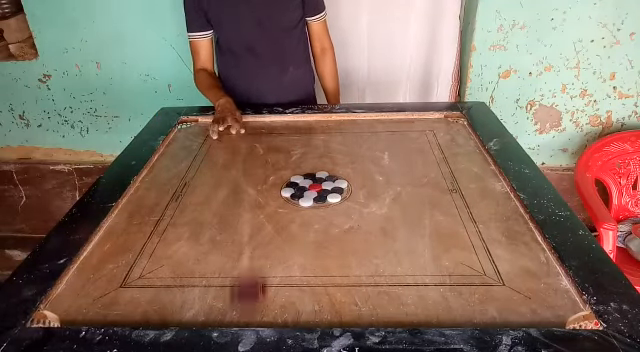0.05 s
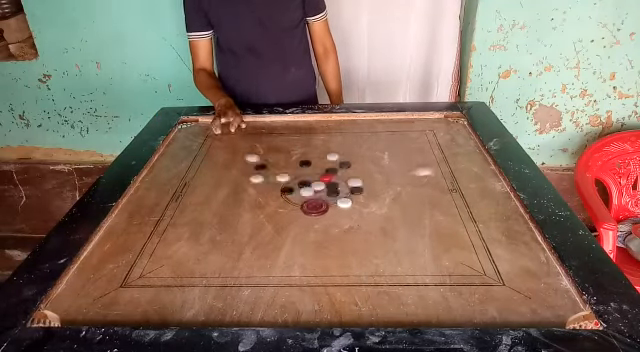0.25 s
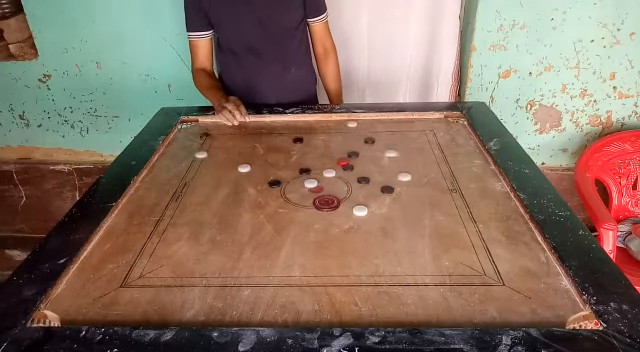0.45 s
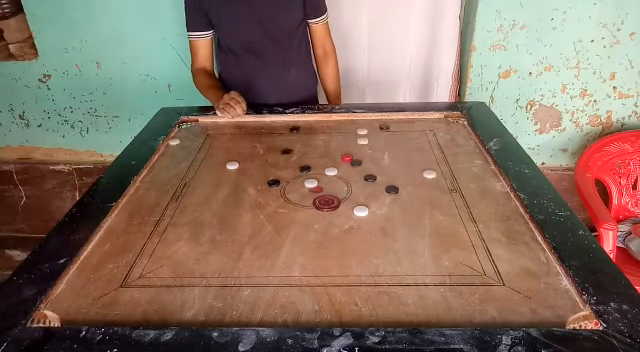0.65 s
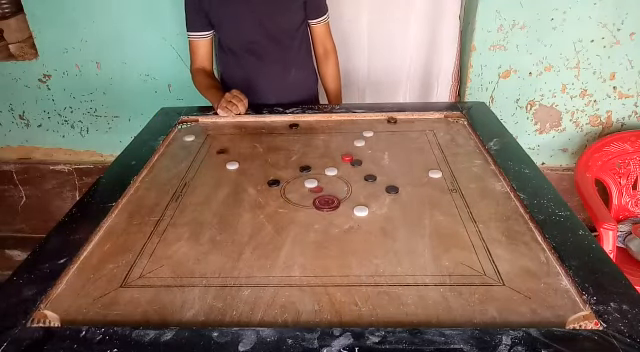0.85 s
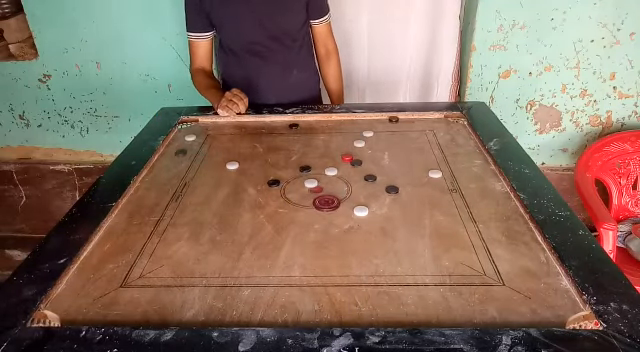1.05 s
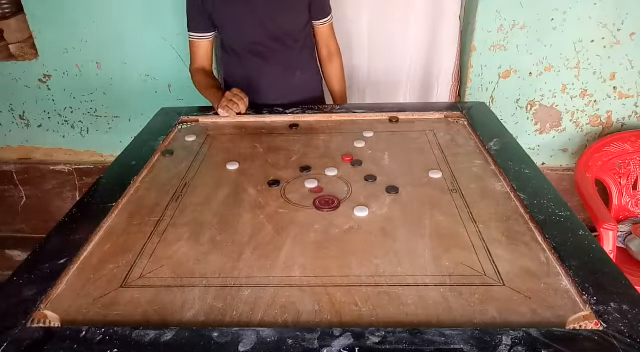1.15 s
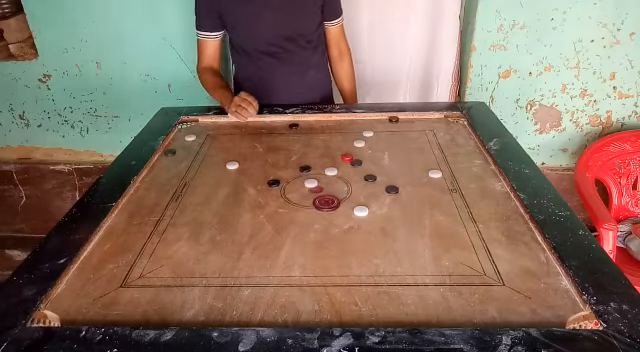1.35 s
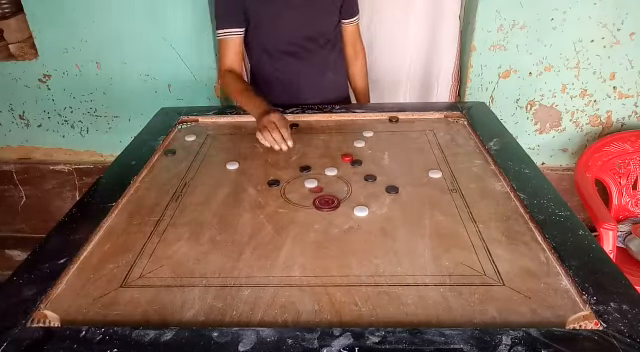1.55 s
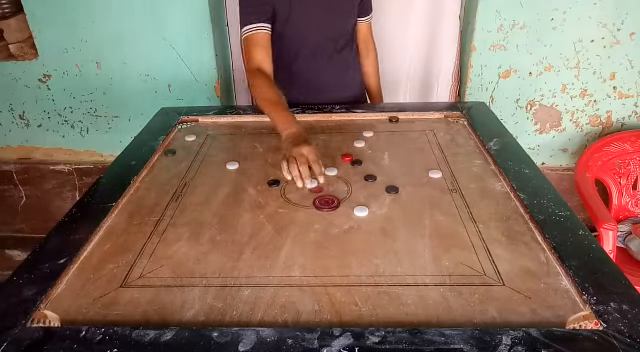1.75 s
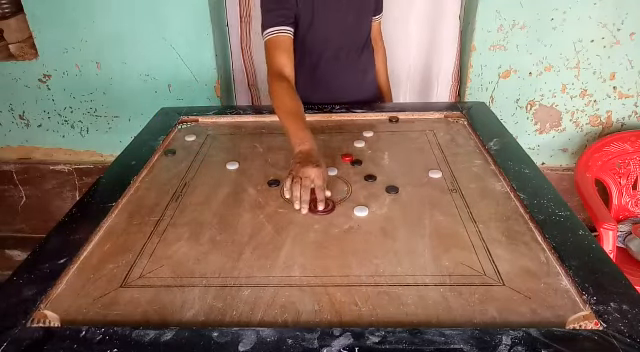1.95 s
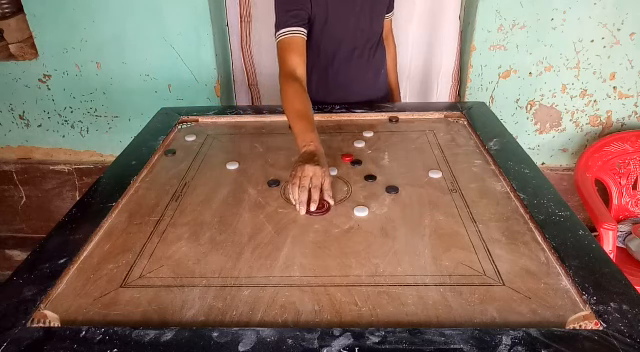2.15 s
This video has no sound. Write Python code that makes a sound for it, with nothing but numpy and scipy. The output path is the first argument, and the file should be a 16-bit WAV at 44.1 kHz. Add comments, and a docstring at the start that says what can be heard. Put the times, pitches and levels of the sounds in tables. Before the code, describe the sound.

Sharp clacks of a carrom break, with discs skating over wood and knocking to a stop.

```python
"""A carrom break in a small room. A finger flicks the striker, which cracks into the pack of discs and
thumps the frame; each impact excites the modes of disc and board, and the hardest overload the close
microphone. The discs skate over the wood with a grainy friction noise, clack on each other and the rim,
and come to rest. A bird chirps faintly outside, and a hand drags the striker back over the board."""
import sys
import numpy as np
from scipy import signal
from scipy.fft import rfft, irfft
from scipy.io import wavfile
from scipy.ndimage import uniform_filter1d

SR = 44100
rng = np.random.default_rng(int(sys.argv[2]) if len(sys.argv) > 2 else 0)


def wav_out(sig):
    """Save sig, one row per channel (or a flat mono array), as 16-bit PCM at SR to the path in sys.argv[1]."""
    wavfile.write(sys.argv[1], SR, np.round(np.clip(np.atleast_2d(sig).T, -1, 1) * 32767).astype(np.int16))


N = 97020
T = np.arange(N) / SR


# Impacts: the finger's flick of the striker, then discs striking discs or the rim (time [s], crack [dB], wood
# body [dB], bass [dB], treble [dB], # board modes [dB], disc note [dB], disc note [Hz])
CLACKS = [(.049, -37, -22.5, 14.5, 9, -38, -39, 4520), (.2062, 2, -4, 7, -20, -17.5, -10.5, 4050),
          (0.2109, -6.5, -18, 1, 2, -26, -16, 4150), (.2195, -10, -11, 14.5, -17, -26, -30, 4180),
          (0.3101, -6.5, -22, 12.5, 8, -36, -20, 4160), (0.4486, -3.5, -17.5, -25, 3, -31, -8.5, 4233),
          (.557, -15.5, -17.5, -7, -12, -30.5, -30, 3800), (.5703, -15, -18.5, -11, -2, -33, -22, 4250),
          (0.6184, -15, -32, 14, -3, -46, -32, 4120), (0.6254, -16, -21, 4.5, -3, -33.5, -16, 4360),
          (0.7683, -15, -22.5, -0.5, -3, -31, -18.5, 4710), (0.84, -15, -43, -21, 2, -39.5, -17, 4290),
          (0.9974, -26, -46, 7, -3, -39, -19, 4390), (1.3176, -29, -20, -5, -9, -36.5, -22, 4510)]
def clack(crack_db, body_db, bass_db, treble_db, ring_db, disc_db, disc_hz):
    """Impulse response: an impact excites disc, board and room, and their free decays superpose."""
    t, brief = T[:32768], T[:2048]
    contact = amp(crack_db) * crack(brief, treble_db) + disc_modes(brief, disc_db, disc_hz)
    wood = amp(body_db) * wood_body(t, bass_db, treble_db) + board_modes(t, ring_db, bass_db, treble_db)
    room = amp(-12.5) * np.hypot(amp(body_db), amp(crack_db - 6)) * room_tail(t, bass_db, treble_db)
    out = wood * rise(t, seconds=.002) + room
    add(out, 0, contact * rise(brief, seconds=.00033))
    return out


# Spectrum of a hard contact (frequency [Hz], level [dB])
CRACK = [(100, -35), (400, -2), (800, -19), (1500, 6.5), (2200, -4), (3100, 11.5), (4300, 6.5),
         (5500, -1.5), (7000, -16), (9500, -44), (15000, -46)]
def crack(t, treble_db):
    """A short contact radiates a broad band: a sharp tick and a slightly longer burst."""
    envelope = fade(t, t60=.024) + amp(1) * fade(t, t60=.007)
    return noise(CRACK, len(t), treble_db=treble_db) * envelope


# Modes of a disc (frequency [multiple of its note], level [dB])
DISC_MODES = [(0.722, -0.5), (.83, -8.5), (1, 1.5)]
def disc_modes(t, level_db, note_hz):
    """Free vibration: a struck disc rings briefly as a sum of damped sinusoids."""
    modes = sum(amp(level_db + db) * sine(note_hz * ratio * t + rng.random((2, 1)))
                for ratio, db in DISC_MODES)
    return modes * fade(t, t60=.04)


# Spectrum of the struck wood (frequency [Hz], level [dB])
WOOD = [(60, -48), (150, -44), (260, -20), (420, -3), (620, -8), (800, -3.5), (1300, 3), (2300, 3),
        (3100, 2), (4200, 2.5), (5500, -16), (7000, -18.5), (9500, -53.5), (15000, -63)]
# Its decay (frequency [Hz], T60 [s])
WOOD_T60 = [(100, 0.56), (400, 0.27), (1200, 0.11), (3500, 0.17), (7000, 0.28), (14000, .1)]
def wood_body(t, bass_db, treble_db):
    """Modal overlap: the wood's densely spaced modes merge into decaying noise."""
    return damp_bands(noise(WOOD, len(t), bass_db, treble_db), WOOD_T60)


# Strongest modes of the board and its frame (frequency [Hz], level [dB], T60 [s])
BOARD_MODES = [(232.1, -16, 0.44), (398.2, -11, 0.24), (469.6, -7.5, 0.25), (870, -6, 0.14),
               (1026, -12, 0.08), (1230, -4.5, 0.14), (1461, -10.5, 0.14), (1759, -11, 0.34),
               (1820, -6, 0.38), (2886, 0, 0.27), (2900, -13, 0.27), (3154, -4.5, 0.41), (3410, -4.5, 0.44),
               (3745, -7, 0.24), (4130, -12.5, 0.13)]
def board_modes(t, ring_db, bass_db, treble_db, spot_db=3, spot_hz=6):
    """Modal excitation: each point of impact rings the board's modes a little differently."""
    out = np.zeros(len(t))
    for hz, db, t60 in BOARD_MODES:
        phase, spot, detune = rng.uniform(-.9, 1, 3)
        gain = amp(ring_db + db + spot_db * spot) * shelves(hz, bass_db, treble_db)
        out += gain * fade(t, t60) * sine((hz + spot_hz * detune) * t + phase)
    return out


def board_resonance(friction, t60=.28):
    """Forced vibration: friction drives each mode of the board as a damped resonator."""
    radius = fade(1 / SR, t60)
    gain = np.sqrt(2 * (1 - radius ** 2))
    return sum(amp(db) * gain * signal.lfilter([1], [1, -radius * np.exp(2j * np.pi * hz / SR)], friction)
               for hz, db, _ in BOARD_MODES).real


# Pushes that sway the whole board (time [s], level [dB])
SWAYS = [(0.068, -37), (.312, -29.5)]
def thump(strike_s=.3099, start_hz=348, end_hz=81, sag_s=.0016, decay_s=.0015, knock_hz=588, sway_hz=93.4):
    """Damped transients: the striker knocks the frame and jolts the microphone; pushes sway the board."""
    out, t = np.zeros((2, N)), T[:SR // 2]
    hz = end_hz + (start_hz - end_hz) * np.exp(-t / sag_s)
    jolt = amp(7.5) * np.exp(-t / decay_s) * sine(np.cumsum(hz) / SR)
    knock = amp(-5.5) * fade(t, t60=.012) * sine(knock_hz * t)
    add(out, strike_s, -(jolt + knock))
    for s, db in SWAYS:
        add(out, s, amp(db) * fade(t, t60=.38) * sine(sway_hz * t))
    return out


# Knocks on the frame (time [s], level [dB], frequency [Hz])
KNOCKS = [(.2062, -9.5, 767), (.4487, -17.5, 803), (.557, -27, 771), (.7688, -21.5, 775),
          (1.118, -34.5, 477), (1.3176, -23, 778), (1.472, -38, 507), (1.69, -45, 491)]
def frame_knocks(upper_ratio=1.145):
    """Resonance: the frame answers a knock with a low mode and a weaker one just above it."""
    out, t = np.zeros((2, N)), T[:16384]
    for s, db, hz in KNOCKS:
        modes = sine(hz * t) + amp(-7) * sine(hz * upper_ratio * t)
        add(out, s, amp(db) * rise(t, seconds=.0045) * fade(t, t60=.12) * modes)
    return out


# Course of the skating discs (time [s], rubbing [dB], rumble [dB])
SLIDE = [(.0, -55, -56), (0.038, -50, -48), (0.06, -32.5, -26.5), (.12, -34, -41), (.2, -32.5, -42.5),
         (.28, -32, -46), (.4, -23, -37), (0.441, -25, -40), (.46, -22, -80), (.51, -25, -71),
         (.54, -26.5, -46.5), (0.662, -22, -42), (.75, -25.5, -39.5), (.86, -28, -42), (.95, -33.5, -42.5),
         (1.1, -38, -43), (1.2, -41.5, -43.5), (1.3, -38.5, -45.5), (1.46, -52, -47.5), (1.58, -60, -50),
         (1.74, -64, -53), (1.901, -57.5, -59.5), (2.1, -56.5, -53.5), (2.19, -61, -46)]
# Spectra of rubbing and of rolling rumble (frequency [Hz], level [dB])
RUB = [(130, -42), (260, -11.5), (500, -4.5), (800, -0.5), (1200, -5), (2000, -1.5), (3300, 1), (4300, 1),
       (5600, -15), (7000, -19.5), (8400, -51.5), (15000, -42)]
RUMBLE = [(30, -17), (70, -10.5), (120, 7), (185, -4.5), (250, -5), (330, -4.5), (490, 3), (800, -3),
          (1400, -12.5), (4000, -47)]
def sliding():
    """Sliding friction: grainy rubbing, board resonance and rumble die away as the discs slow."""
    s, rub_db, rumble_db = np.transpose(SLIDE)
    envelope = amp(np.interp(T, s, rub_db))
    hiss = noise(RUB, N) * envelope + skids()
    ring = amp(-29) * board_resonance(envelope * rng.standard_normal(N))
    return hiss * grain() + ring + noise(RUMBLE, N) * amp(np.interp(T, s, rumble_db))


# Fast skids and wobbles (time [s], rise [s], T60 [s], level [dB], treble [dB])
SKIDS = [(.048, 0.0096, 0.15, -26, -2), (0.099, 0.0094, 1, -43.5, 12.5), (0.309, 0.005, 0.39, -21.5, 8.5),
         (0.623, 0.0035, 0.37, -37.5, 8.5), (.893, 0.012, 0.49, -23, -14), (.966, 0.035, 0.22, -18, -2.5),
         (1.071, 0.018, 0.3, -41, -0.5)]
# Their spectrum (frequency [Hz], level [dB])
SKID_HISS = [(500, -33.5), (2000, -14.5), (3000, -4), (4100, 1), (5600, -11), (7000, -10.5), (8500, -30.5),
             (10500, -32.5), (13000, -28.5), (15000, -35)]
def skids():
    """Friction noise: fast motion over the powdered board gives bursts of bright hiss."""
    out, t = np.zeros((2, N)), T[:SR // 2]
    for s, rise_s, t60, db, treble_db in SKIDS:
        envelope = amp(db) * rise(t, rise_s) * fade(np.maximum(t - rise_s, 0), t60)
        add(out, s, noise(SKID_HISS, len(t), treble_db=treble_db) * envelope)
    return out


def grain(catches_per_s=900, decay_s=.011, spread_db=1.5):
    """Shot noise: countless tiny catches between disc and board make the friction's level flutter."""
    size = amp(spread_db * np.minimum(rng.exponential(1, N), 4))
    catches = size * (rng.random(N) < catches_per_s / SR)
    power = signal.lfilter([1], [1, -np.exp(-1 / (decay_s * SR))], catches ** 2)
    return np.sqrt(.3 + .7 * power / power.mean())


# Course of the dragged striker (time [s], level [dB])
DRAG = [(1.95, -110), (2.015, -53), (2.028, -54), (2.036, -36.5), (2.062, -32), (2.1, -30.5), (2.13, -33),
        (2.17, -41.5), (2.2, -46)]
# Spectrum of its rubbing (frequency [Hz], level [dB])
DRAG_RUB = [(100, -12), (300, -34), (520, -4), (900, -4), (1350, -2.5), (1800, -2), (2300, 1.5),
            (2800, -5.5), (4200, -0.5), (5500, -17), (7300, -25), (9500, -46), (15000, -41.5)]
# Its rough note (time [s], frequency [Hz], level [dB])
SCRAPE = [(2.03, 1432, -39), (2.046, 1478, -34), (2.095, 1342, -29), (2.17, 1220, -45)]
def striker_drag():
    """Friction under the hand: the striker rubs, catches with a falling note and rings the board."""
    rub = noise(DRAG_RUB, N) * amp(np.interp(T, *np.transpose(DRAG))) * np.sqrt(grain())
    s, hz, db = np.transpose(SCRAPE)
    envelope = amp(np.interp(T, s, db)) * (T > s[0]) * (T < s[-1])
    note = rough_note(np.interp(T, s, hz), half_width_hz=133) * envelope
    return rub + amp(-21.5) * board_resonance(rub) + note


# Reverberation of the room (frequency [Hz], T60 [s])
ROOM_T60 = [(100, 0.94), (1000, 0.45), (4000, 0.35), (12000, 0.47)]
def room_tail(t, bass_db, treble_db):
    """Reverberation: reflections of the wood's sound build into a diffuse field and decay."""
    return damp_bands(noise(WOOD, len(t), bass_db, treble_db), ROOM_T60) * rise(t, seconds=.02)


# Chirps of a distant bird (time [s], level [dB])
CHIRPS = [(1.526, -52), (1.688, -53), (1.857, -55.5), (1.96, -54)]
def bird(length_s=.042, start_hz=5300, end_hz=4650, rasp_hz=240):
    """Frequency modulation: noise makes each falling chirp raspy, and the room's reflections blur it."""
    out, t = np.zeros((2, N)), np.arange(0, length_s, 1 / SR)
    for s, db in CHIRPS:
        rasp = uniform_filter1d(rng.standard_normal(8192), size=40)[:len(t)]
        hz = np.linspace(start_hz, end_hz, len(t)) + rasp_hz * rasp / rasp.std()
        chirp = np.sqrt(abs(np.sin(np.pi * t / length_s))) * sine(np.cumsum(hz) / SR)
        room = rng.standard_normal((2, 8192)) * fade(T[:8192], t60=.06)
        room /= np.linalg.norm(room[0])
        add(out, s, amp(db) * signal.fftconvolve(chirp[None], room, axes=1))
    return out


# Spectrum of the room's noise, and its faint tones (frequency [Hz], level [dB])
AMBIENCE = [(25, -4.5), (60, -7.5), (120, 7), (200, -12.5), (370, -23.5), (500, 8), (650, -8.5),
            (780, -15.5), (900, -18.5), (1550, -19.5), (2100, -7), (2470, -4), (2570, -20.5), (3400, -12),
            (3750, -4.5), (4250, -15), (5000, -7.5), (6000, -27), (9000, -42.5), (15000, -55.5)]
AMBIENT_TONES = [(124, -57.5), (2200, -67), (3745, -71.5)]
def background():
    """Stationary noise: a quiet broad band with a few narrow ones, heard as wavering tones."""
    broad = amp(-56.5) * noise(AMBIENCE, N)
    return broad + sum(amp(db) * rough_note(hz, half_width_hz=20)[0] for hz, db in AMBIENT_TONES)


# Likeness of the sound at the microphone's two ports (frequency [Hz], correlation [0-1])
CORRELATION = [(30, 1), (120, 1), (400, 0.79), (750, 0.7), (1400, 0.1), (3000, 0.05), (12000, 0.079)]
def noise(spectrum, size, bass_db=0, treble_db=0):
    """Spatial coherence: coloured noise reaches two nearby ports most alike at long wavelengths."""
    hz = np.fft.rfftfreq(size, 1 / SR)
    left, independent = np.exp(2j * np.pi * rng.random((2, len(hz))))
    alike = np.clip(at_frequency(CORRELATION, hz), 0, 1)
    right = alike * left + np.sqrt(1 - alike ** 2) * independent
    gain = amp(at_frequency(spectrum, hz))
    gain /= np.sqrt(np.mean(gain ** 2) / size)  # unit RMS ahead of the shelves
    return irfft(np.array([left, right]) * gain * shelves(hz, bass_db, treble_db), size)


def rough_note(hz, half_width_hz):
    """Modulation: low-passed noise on a carrier forms a narrow band around its pitch."""
    white = rng.standard_normal((2, N)) + 1j * rng.standard_normal((2, N))
    slow = signal.sosfilt(signal.butter(2, half_width_hz, fs=SR, output="sos"), white)
    carrier = np.exp(2j * np.pi * np.cumsum(hz * np.ones(N)) / SR)
    return (slow / slow.std() * carrier).real


def damp_bands(x, t60_table):
    """Frequency-dependent damping: each band decays at its own rate."""
    hz, t, bands = signal.stft(x, SR, nperseg=256)
    bands = bands * fade(t, at_frequency(t60_table, hz)[:, None])
    return signal.istft(bands, SR, nperseg=256)[1][:, :x.shape[1]]


def shelves(hz, bass_db, treble_db, bass_hz=551, treble_hz=5560):
    """Shelving gain: lifts or lowers the two ends of the spectrum."""
    bass = 1 / (1 + (hz / bass_hz) ** 4)
    treble = 1 - 1 / (1 + (hz / treble_hz) ** 4)
    return amp(bass_db * bass + treble_db * treble)


def at_frequency(table, hz):
    """Interpolation on a log-frequency axis."""
    f, value = np.transpose(table)
    return np.interp(np.log(hz + 1), np.log(f + 1), value)


def amp(db):
    """Decibels to amplitude ratio."""
    return 10 ** (np.asarray(db) / 20)


def sine(cycles):
    """Simple harmonic motion."""
    return np.sin(2 * np.pi * cycles)


def rise(t, seconds):
    """Linear onset."""
    return np.minimum(t / seconds, 1)


def fade(t, t60):
    """Exponential decay, by 60 dB in t60 seconds."""
    return np.exp(-np.log(1000) * t / t60)


def add(mix, s, sound):
    """Superposition of a sound starting at s seconds."""
    part = mix[:, max(round(s * SR), 0):][:, :sound.shape[-1]]
    part += sound[..., :part.shape[1]]


# Response of the right port relative to the left (frequency [Hz], gain [dB])
RIGHT_PORT = [(40, -12), (100, -7), (220, -7), (700, -7.5), (1400, -7.5), (3000, -11.5), (5500, -6),
              (9000, 7), (14000, -11)]
def scene():
    """Superposition: all sources sum at two ports, the right one weaker in most bands."""
    out = thump() + frame_knocks() + sliding() + striker_drag() + bird() + background()
    for s, *impact in CLACKS:
        add(out, s, clack(*impact))
    right_gain = amp(at_frequency(RIGHT_PORT, np.fft.rfftfreq(2 * N, 1 / SR)))
    right = irfft(rfft(out[1], 2 * N) * right_gain)[:N]
    return np.array([out[0], right])


# Brief dips in level ahead of sharp clacks (start [s], end [s], gain [dB])
DIPS = [(.191, 0.2061, -16), (0.431, 0.45, -13.5), (0.61, 0.6197, -9.5), (0.83, 0.8419, -10.5)]
def record(dry, low_cut_hz=43, high_cut_hz=15600):
    """Clipping and band limiting: the level dips briefly, peaks overload, and filters trim both ends."""
    dip_db = sum(db * ((T > start) & (T < end)) for start, end, db in DIPS)
    dipped = dry * amp(uniform_filter1d(dip_db * 1., size=64))
    clipped = np.clip(dipped, -1, 1)
    low_cut = signal.butter(2, low_cut_hz, "high", fs=SR, output="sos")
    high_cut = signal.firwin(255, high_cut_hz, window=("kaiser", 8), fs=SR)
    return signal.oaconvolve(signal.sosfilt(low_cut, clipped), high_cut[None], "same")


dry = scene()
out = record(dry)
wav_out(out)
```